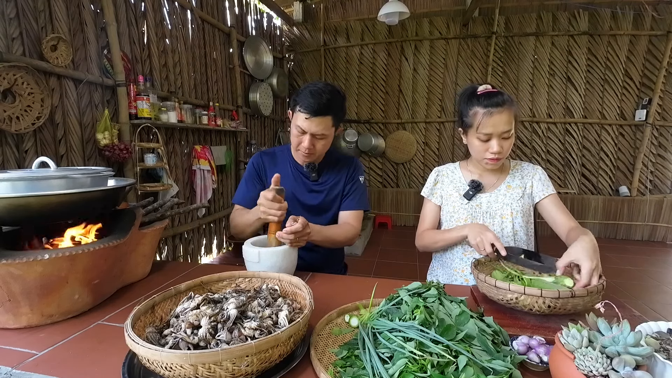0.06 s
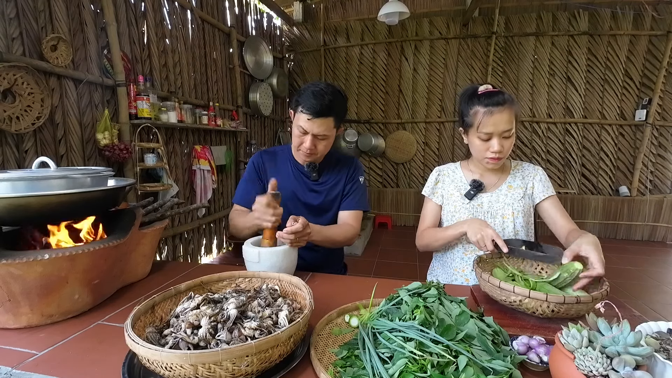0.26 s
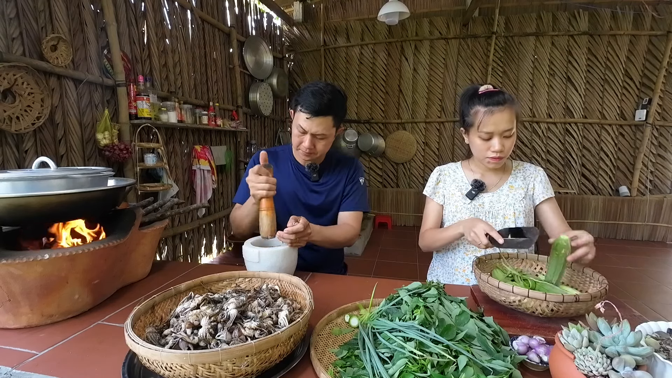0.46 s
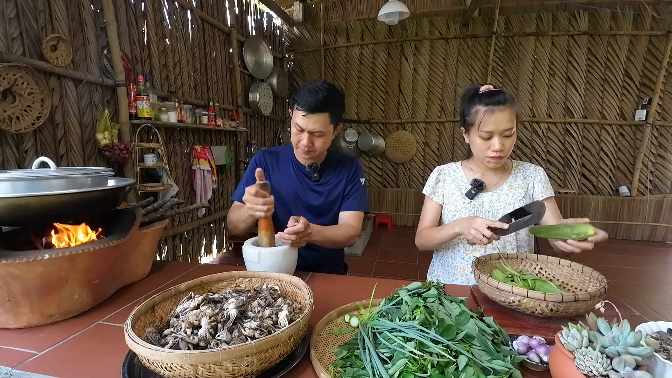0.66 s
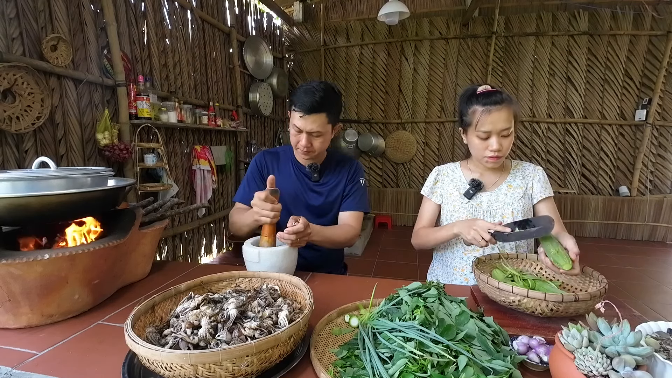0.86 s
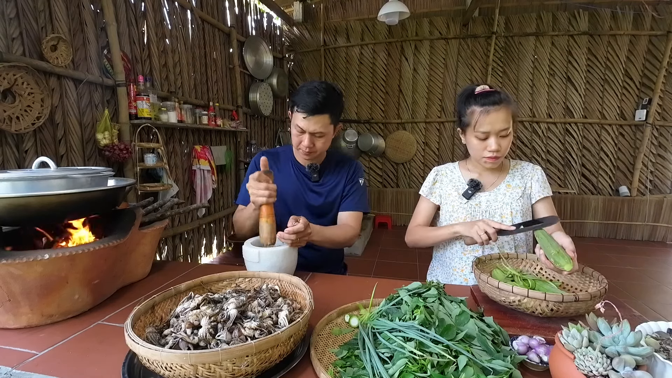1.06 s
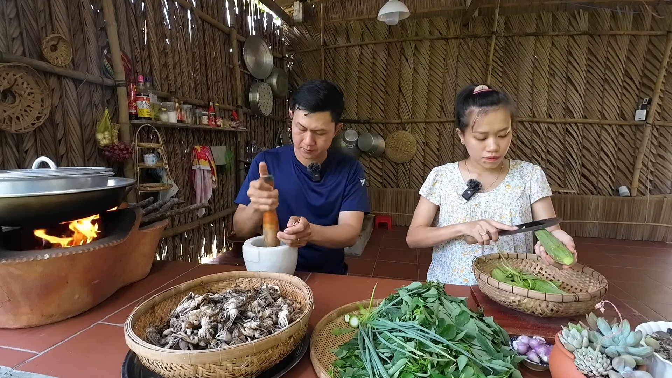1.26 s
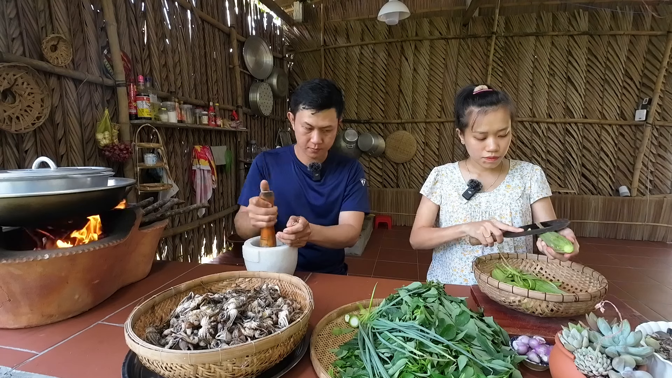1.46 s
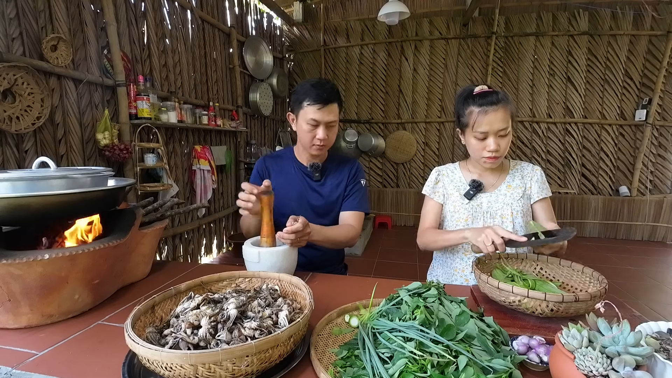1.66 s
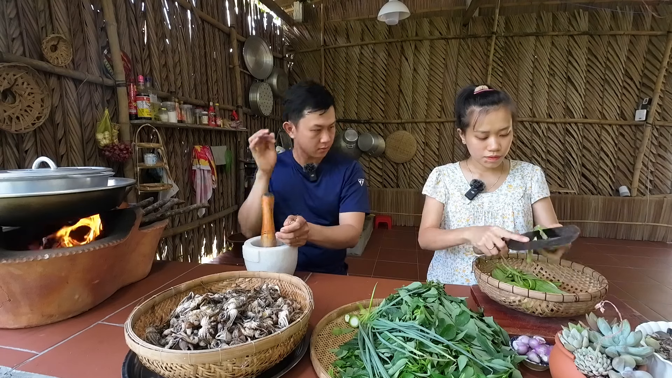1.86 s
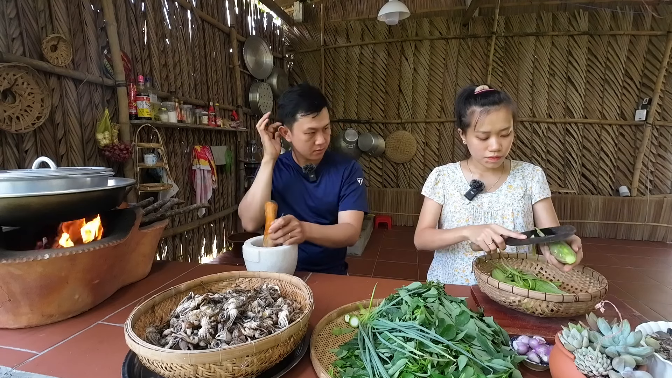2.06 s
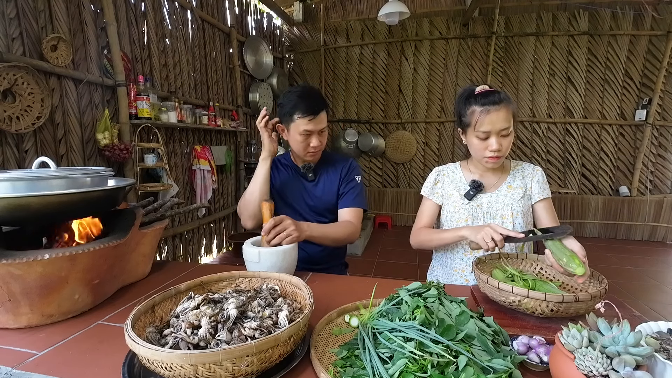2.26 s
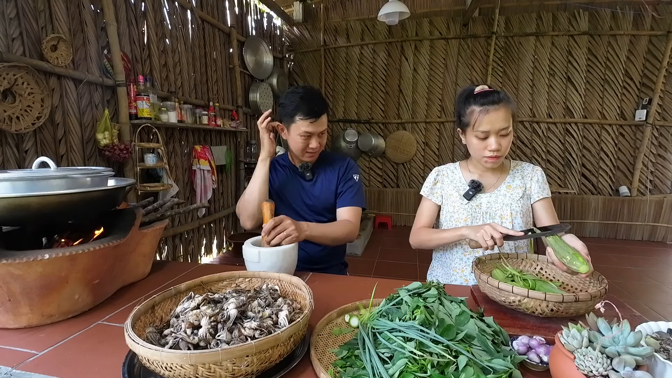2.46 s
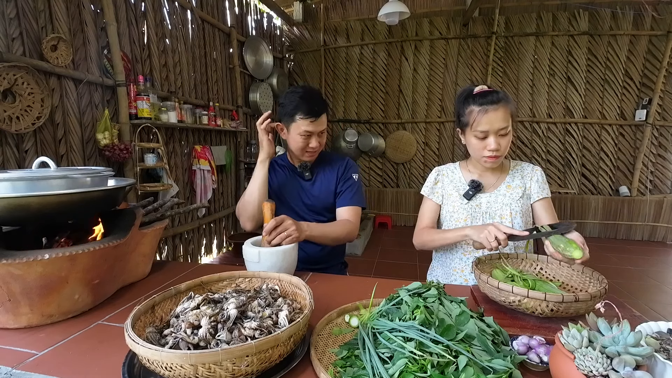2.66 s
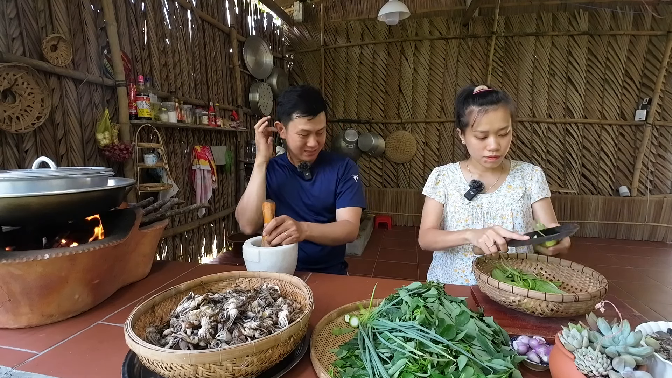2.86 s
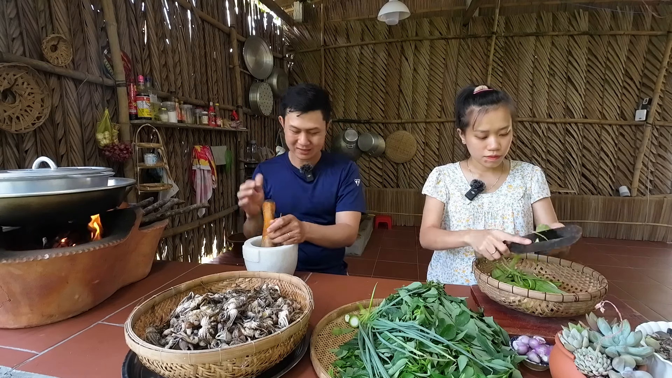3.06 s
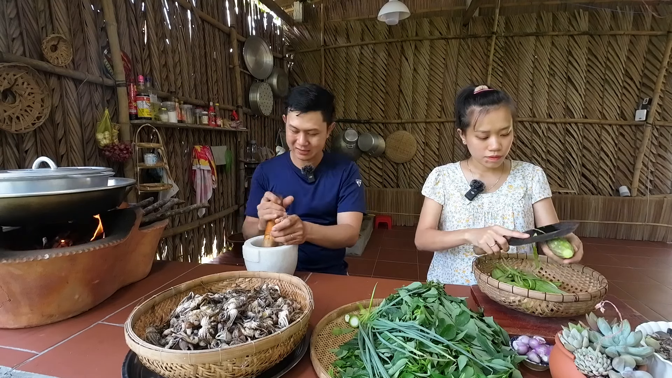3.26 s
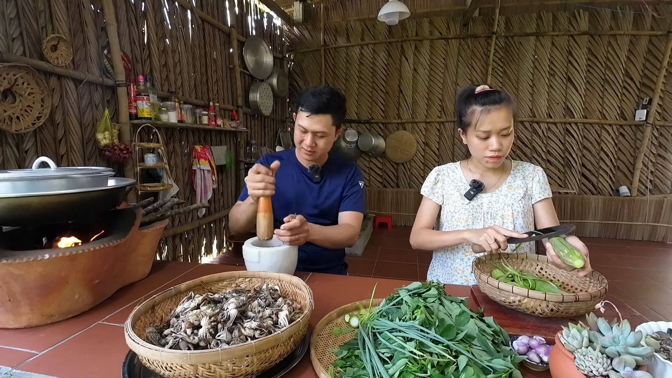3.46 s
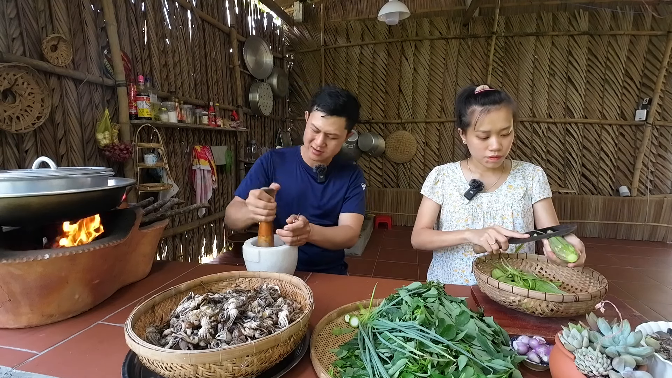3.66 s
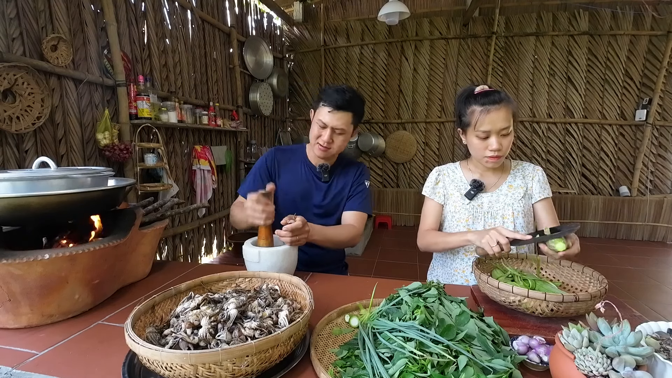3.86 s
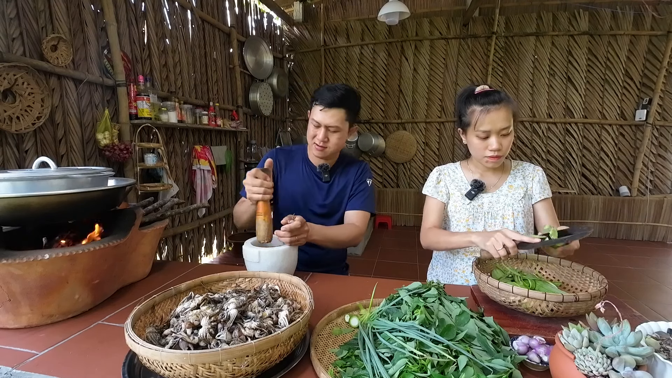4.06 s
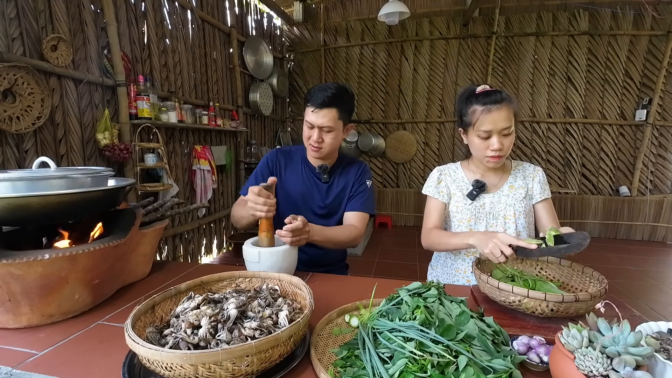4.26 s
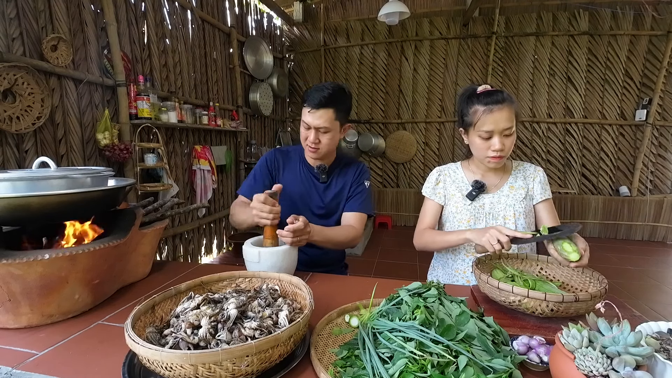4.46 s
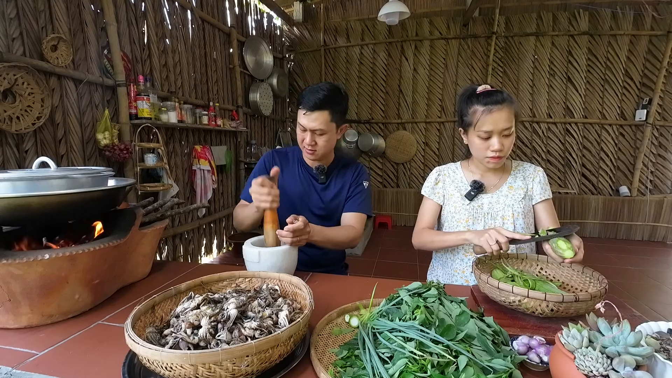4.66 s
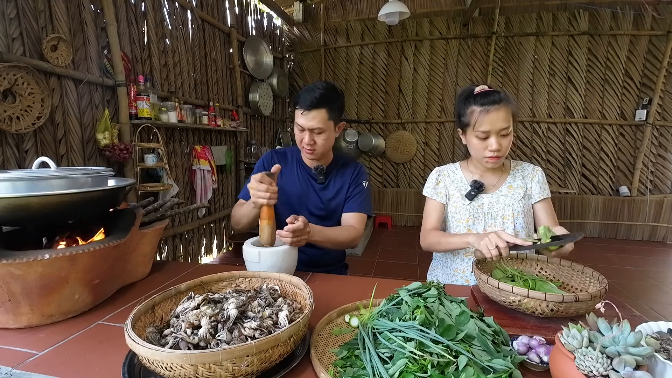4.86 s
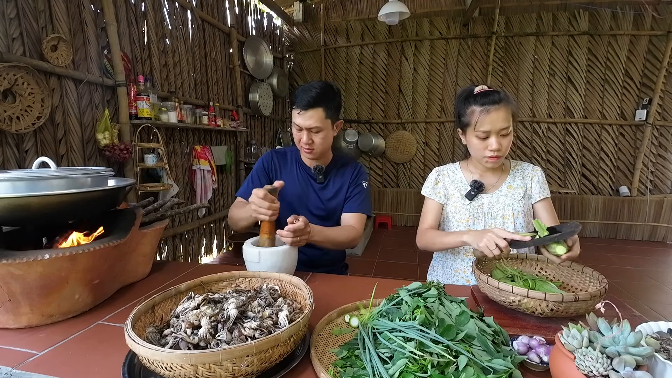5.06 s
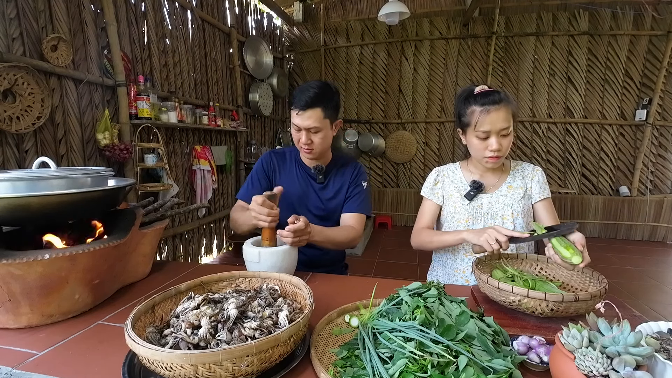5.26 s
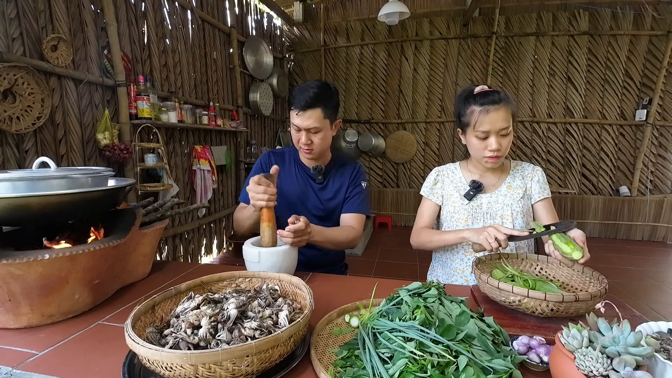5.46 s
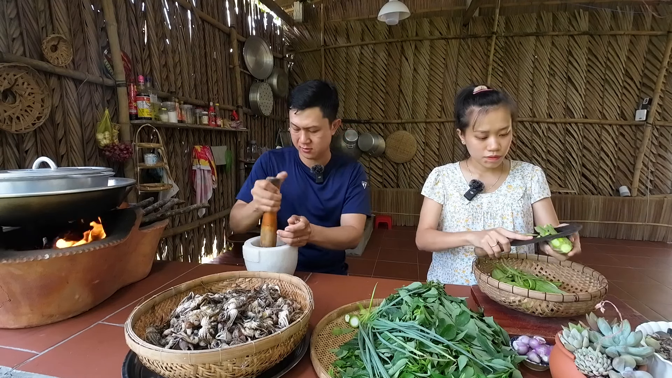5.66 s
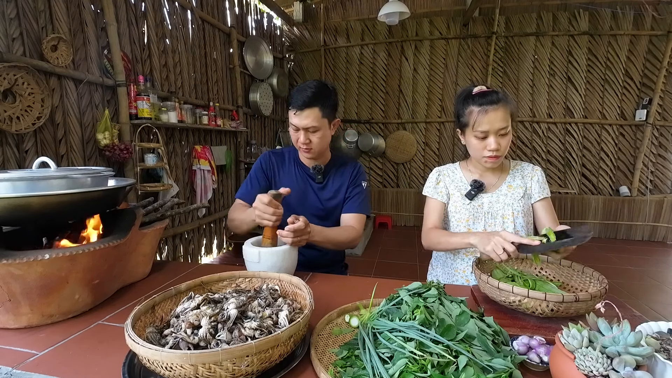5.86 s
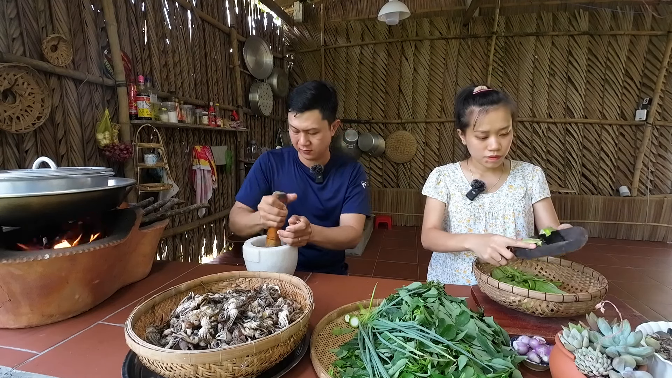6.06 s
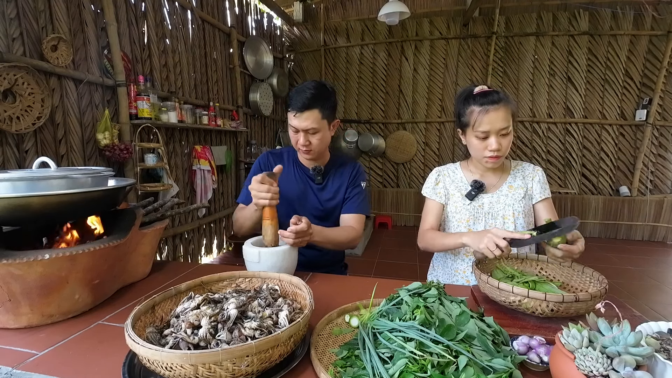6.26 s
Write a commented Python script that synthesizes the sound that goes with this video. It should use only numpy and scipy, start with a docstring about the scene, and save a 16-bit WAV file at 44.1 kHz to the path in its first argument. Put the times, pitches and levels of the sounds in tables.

```python
"""Pounding crabs in a stone mortar

A wooden pestle pounds small crabs in a mortar on a table, in a thatched outdoor kitchen. Each blow
cracks shells, then lands with a thud; the hardest are loud enough to clip. As the shells turn to paste,
the crunch shortens and the thud grows. Midway the pestle is let go and rattles to rest.
Nearby a knife rasps through the peel of a gourd, and a far bird whistles."""
import sys
import numpy as np
from scipy import signal
from scipy.fft import rfft, irfft, next_fast_len
from scipy.io import wavfile
from scipy.ndimage import uniform_filter1d

SR = 44100
rng = np.random.default_rng(int(sys.argv[2]) if len(sys.argv) > 2 else 0)


def to_wav(sig):
    """Store sig (one row per channel, or 1-D mono) as 16-bit WAV at the path in sys.argv[1].

    Samples outside -1..1 are clipped; the rate is SR.
    """
    pcm = np.clip(np.atleast_2d(sig), -1, 1) * 32767
    pcm = np.round(pcm).astype(np.int16)
    wavfile.write(sys.argv[1], SR, pcm.T)  # frames by channels


N = 279064

# The tone of breaking shell. Each row: frequency in Hz, relative level in dB.
SHELL_SPECTRUM = [(200, -17), (700, -5), (1000, -.5), (1300, 0), (1900, 5), (2350, -1), (2900, 2),
                  (4400, -7), (6300, -.5), (8200, 3), (10000, -1.5), (13000, -6), (16000, -10)]


def amp(db):
    """Decibels to gain."""
    return 10 ** (np.asarray(db) / 20)


def unit(x):
    """Scales to rms 1."""
    return x / np.sqrt(np.mean(x ** 2) + 1e-20)


def curve(points, hz):
    """Interpolates a table on a log-frequency axis."""
    point_hz, values = np.transpose(points)
    return np.interp(np.log(hz + 1), np.log(point_hz + 1), values)


def add(mix, s, sound):
    """Mixes a sound in at s seconds."""
    start = round(s * SR)
    sound = sound[max(-start, 0):]
    part = mix[max(start, 0):][:len(sound)]
    part += sound[:len(part)]


def colour(x, db_at):
    """Equalises by a rule that gives dB for each frequency; rms 1."""
    size = next_fast_len(len(x), True)
    gain = amp(db_at(np.fft.rfftfreq(size, 1 / SR)))
    return unit(irfft(rfft(x, size) * gain, size)[:len(x)])


def die_away(x, spectrum, t60s):
    """Lets each frequency start at its own level and fade at its own speed."""
    hz, age, bands = signal.stft(x, SR, nperseg=256)
    level_db = curve(spectrum, hz)[:, None] - 60 * age / curve(t60s, hz)[:, None]
    return signal.istft(bands * amp(level_db), SR, nperseg=256)[1][:len(x)]


def grit(count, spread_db, grain_samples=6):
    """Noise made of tiny fractures of uneven strength."""
    noise = rng.standard_normal(count)
    strength = unit(uniform_filter1d(rng.standard_normal(count), grain_samples))
    return noise * amp(spread_db * strength)


def bump(t, ms):
    """A smooth pulse around t = 0."""
    return np.exp(-.5 * (t * 1000 / ms) ** 2)


def burst(t, ms, db_at):
    """A short cluster of fractures with steep flanks, rms 1 at its height."""
    envelope = np.exp(-abs(t * 1000 / (1.8 * ms)) ** 4)
    cluster = colour(grit(len(t), spread_db=4), db_at) * envelope
    return cluster * np.linalg.norm(envelope) / np.linalg.norm(cluster)


def air(level_db=-44.5, sway_db=1.1):
    """A steady bed of outdoor air, swaying slightly in level."""
    # The tone of the air. Each row: frequency in Hz, relative level in dB.
    spectrum = [(15, -39), (25, -33), (53, -4), (114, -5.5), (190, -3), (317, -1.5), (373, -2.5), (531, -6),
                (775, -6.5), (1160, -9), (1940, -11.5), (2220, -14), (16000, -26)]
    sway = colour(rng.standard_normal(N), lambda hz: -hz * 2)
    bed = colour(rng.standard_normal(N), lambda hz: curve(spectrum, hz))
    return amp(level_db + sway_db * sway) * bed


def bird():
    """A far bird gives faint rising whistles."""
    # Each row: start in seconds, length in seconds, first and last pitch in Hz, level in dB.
    notes = [(0.094, 0.103, 1090, 1175, -45), (.72, 0.059, 1167, 1200, -37.5)]
    out = np.zeros(N)
    for s, length, start_hz, end_hz, db in notes:
        hz = np.linspace(start_hz, end_hz, round(length * SR))
        whistle = np.sin(2 * np.pi * np.cumsum(hz) / SR)
        add(out, s, amp(db) * np.hanning(len(hz)) * whistle)
    return out


def hiss(grain_db=2.5):
    """A soft, grainy high hiss comes and goes between the knife strokes."""
    # Each row: start and end in seconds, level in dB.
    swells = [(1.85, 1.91, -51), (2.99, 3.22, -48.5), (3.22, 3.39, -49.5), (4.12, 4.42, -45.5),
              (4.48, 4.68, -49.5)]
    # The tone of the hiss. Each row: frequency in Hz, relative level in dB.
    spectrum = [(500, -9), (4000, -6), (5500, -8), (9000, -6), (12200, 2.5), (13500, -6), (16000, -8)]
    out = np.zeros(N)
    for start, end, db in swells:
        count = round((end - start) * SR)
        noise = colour(grit(count, grain_db, grain_samples=40), lambda hz: curve(spectrum, hz))
        add(out, start, amp(db) * noise * signal.windows.tukey(count, .5))
    return out


def peeling(grain_db=2.2, catch_db=1.3, bite_s=.07, release_s=.025, swell_db_per_s=7):
    """The blade bites in, rasps through the peel with growing pressure, catches unevenly, slips out."""
    # Each row: start and end in seconds, level in dB.
    strokes = [(1.32, 1.70, -45), (2.57, 2.94, -39.7), (3.55, 3.90, -46), (4.02, 4.125, -45.5),
               (4.62, 4.87, -44.5), (5.41, 5.87, -43.5)]
    # The tone of the blade in the peel. Each row: frequency in Hz, relative level in dB.
    spectrum = [(300, -10), (800, 2), (2000, 1), (2600, -1), (3200, 3), (4200, -4), (6000, -3), (9000, -1),
                (13500, 0), (15000, 7), (16000, 0)]
    out = np.zeros(N)
    for start, end, db in strokes:
        t = np.arange(round((end - start) * SR)) / SR
        rasp = colour(grit(len(t), grain_db, grain_samples=40), lambda hz: curve(spectrum, hz))
        catching = colour(rng.standard_normal(len(t)), lambda hz: -hz / 2)
        contact = np.minimum(t / bite_s, 1) * np.minimum(t[::-1] / release_s, 1)
        pressure = amp(swell_db_per_s * (t - t.mean()))
        add(out, start, amp(db + catch_db * catching) * rasp * contact * pressure)
    return out


def tick(ms, centre_hz, octaves):
    """One small fracture or touch in a band of its own, centred in half a second."""
    t = np.arange(-SR // 4, SR // 4) / SR
    return burst(t, ms, lambda hz: -10 * np.log10(1 + (np.log2((hz + 1) / centre_hz) / octaves) ** 4))


def shell_bits_and_handling():
    """Broad snaps of shell, narrow pings of chips, dull taps and soft rubs."""
    # Larger pieces of shell snap. Each row: time in seconds, level in dB, half-length in ms.
    snaps = [(.288, -27, 1), (.2965, -15, 1.9), (.335, -29, 5), (.574, -22, 1), (.5852, -4, .9),
             (.587, -19.5, 3.9), (.616, -31, 3.7), (.852, -32, 1.5), (5.678, -22.5, .7)]
    # Flying chips land. Each row: time in seconds, level in dB, pitch in Hz.
    chips = [(1.170, -31, 11500), (1.483, -20, 6500), (5.060, -32.5, 7640)]
    # Hand and knife tap lightly. Each row: time in seconds, level in dB, band centre in Hz.
    taps = [(1.7805, -37, 2500), (2.932, -43, 800), (3.199, -43, 3000), (3.457, -46, 1430)]
    # Handling rubs. Each row: midpoint in seconds, level in dB, half-length in ms,
    # band centre in Hz, half-width in octaves.
    rubs = [(3.58, -48, 60, 1800, .16), (3.835, -45, 28, 1680, .83), (4.10, -42, 9, 900, .4)]
    ticks = [(s, db, tick(ms, centre_hz=5300, octaves=1.8)) for s, db, ms in snaps]
    ticks += [(s, db, tick(ms=.95, centre_hz=hz, octaves=.18)) for s, db, hz in chips]
    ticks += [(s, db, tick(ms=1.9, centre_hz=hz, octaves=.65)) for s, db, hz in taps]
    ticks += [(s, db, tick(ms, hz, octaves)) for s, db, ms, hz, octaves in rubs]
    out = np.zeros(N)
    for s, db, sound in ticks:
        add(out, s - len(sound) / 2 / SR, amp(db) * sound)
    return out


def kitchen_tail(x, rise_s=.0096):
    """A short diffuse tail under the thatch; it changes as the people move."""
    # The tone of the tail as it starts. Each row: frequency in Hz, level in dB.
    spectrum = [(100, -49), (300, -43), (800, -45), (2000, -48.5), (14000, -51)]
    # Its decay. Each row: frequency in Hz, seconds to fall 60 dB.
    t60s = [(150, .36), (600, 0.2964), (2000, 0.2365), (14000, 0.03)]
    age, clock = np.arange(SR // 2) / SR, np.arange(N) / SR
    out = np.zeros(N)
    for k in range(3):
        tail = die_away(rng.standard_normal(len(age)), spectrum, t60s) * (1 - np.exp(-age / rise_s))
        crossfade = np.cos(np.pi * (clock + k / 3))
        out += signal.fftconvolve(x * crossfade, tail)[:N]
    return out


def reflections(x):
    """Table top and bodies throw the sound back within a few hundredths of a second."""
    # Each row: delay in seconds, gain.
    echoes = [(.0047, 0.21), (.0074, 0.79), (.0115, -0.16), (.0154, 0.11), (.0229, 0.2)]
    out = np.zeros(N)
    for delay, gain in echoes:
        add(out, delay, gain * x)
    return out


def low_cut(x, corner_hz=74):
    """Thins the deepest bass of the thuds."""
    size = next_fast_len(N, True)
    hz = np.fft.rfftfreq(size, 1 / SR)
    return irfft(rfft(x, size) * hz ** 2 / (hz ** 2 + corner_hz ** 2), size)[:N]


def thud(t, table_db, contact_ms, table_below_hz=230, detune=.011):
    """The pestle lands: a soft push rings mortar and table; a cushioned landing is duller."""
    # Mortar and table ringing. Each row: frequency in Hz, relative level in dB, seconds to fall 60 dB.
    modes = [(102.5, -27, 0.16), (157.7, -20.5, 0.27), (193.5, -13.5, 0.19), (209.3, -16.5, 0.14),
             (257.2, -13.5, 0.078), (369.7, -23, 0.16), (437.2, -14.5, 0.1), (492.4, -6.5, 0.12),
             (576, -9.5, 0.069), (685.8, -4.5, 0.037), (799.4, -12.5, 0.059), (890, -34.5, 0.032),
             (1080, -31, 0.11)]
    age, ring = np.maximum(t, 0), np.zeros(len(t))
    for hz, db, t60 in modes:
        level_db = db + table_db * (hz < table_below_hz) - 60 * age / t60
        pitch = hz * (1 + detune * rng.standard_normal())
        ring += amp(level_db) * np.cos(2 * np.pi * pitch * age)
    push = bump(t[abs(t) < .005], contact_ms)
    return signal.fftconvolve(ring * (t >= 0), push / push.sum(), "same")


def clack(t, ms, tilt_db_per_octave, note_hz, detune=.015):
    """The wooden pestle rings briefly; hard shells favour its high notes, grip and spot shift them all."""
    # The wood's ring. Each row: frequency in Hz before tuning to note_hz, relative level in dB,
    # seconds to fall 60 dB.
    modes = [(792, -2, 0.024), (1237, -13, 0.01), (1574, -3.5, 0.016), (1846, 0, 0.015),
             (2037, -4.5, 0.025), (2736, -9.5, 0.019), (3097, -11, 0.014)]
    main_hz = max(modes, key=lambda mode: mode[1])[0]
    push = bump(t + ms / 1000, ms / 2)
    out = np.zeros(len(t))
    for hz, db, t60 in modes:
        decay_per_sample = 1e-3 ** (1 / (t60 * SR))
        envelope = signal.lfilter([1], [1, -decay_per_sample], push)
        pitch = hz * note_hz / main_hz * (1 + detune * rng.standard_normal())
        tone = np.sin(2 * np.pi * (pitch * t + rng.random()))
        level_db = db + tilt_db_per_octave * np.log2(hz / 1500)
        out += amp(level_db) * envelope / envelope.max() * tone
    return out


def rattle(clack_ms=1.1, grit_db=-25, free_hz=2010, free_t60_s=.08, free_db=-11):
    """The loose pestle rocks against the gritty rim; with no hand on it, the wood rings on."""
    # Each row: time in seconds, relative levels of thud and clack in dB.
    knocks = [(1.8906, -8.5, -17.5), (1.9326, -17, -28), (1.9602, -16.5, -37), (1.9746, -29, -37)]
    t = np.arange(-SR // 30, SR // 3) / SR
    early = t + clack_ms / 1000  # the clack leads the thud
    free_ring = (t >= 0) * amp(free_db - 60 * abs(t) / free_t60_s) * np.sin(2 * np.pi * free_hz * t)
    thuds, clacks = np.zeros((2, N))
    for s, thud_db, clack_db in knocks:
        scratch = amp(grit_db) * burst(early, clack_ms, lambda hz: curve(SHELL_SPECTRUM, hz))
        add(thuds, s + t[0], amp(thud_db) * thud(t, table_db=-9, contact_ms=.24))
        wood = clack(early, clack_ms, tilt_db_per_octave=-7, note_hz=1850)
        add(clacks, s + t[0], amp(clack_db) * (wood + free_ring + scratch))
    return thuds, clacks


def pounding(touch_db=-26, touch_s=.0033, table_lead_db=7, table_top_db=1.3):
    """Each blow touches the shells, crunches and clacks through them, lands, and leaves crumbs settling."""
    # Each row: landing in seconds, relative thud level in dB, contact in ms,
    # relative crunch and clack levels in dB, main note of the clack in Hz.
    blows = [(0.0223, -15.5, .19, -4.5, -4.5, 1900), (0.3065, -11.5, .27, -7, -11, 1950),
             (0.5826, -18, .17, -8, -7, 1850), (0.865, -16, .17, -2, -6, 1860),
             (1.1524, -12.3, .14, -5, -7, 1780), (1.4505, -4, .15, -4, -8, 1820),
             (3.6519, -3.4, .19, -6.5, -11.5, 1850), (3.9129, -5.3, .3, -6.5, -12, 2050),
             (4.1862, -2, .34, -2.5, -13, 1750), (4.4649, -2, .16, -5, -13.5, 1850),
             (4.7413, 2, .24, -3.5, -8.5, 1800), (5.0103, 4.5, .1, -4, -6, 1750),
             (5.2793, 1.7, .24, -5.3, -8, 1850), (5.5563, 5, .12, -2, -8.5, 1780),
             (5.8289, .5, .26, -14, -11, 1900), (6.0979, 3, .22, -9.5, -13, 1800)]
    # Crushed shell starting to settle. Each row: frequency in Hz, gain on the shell's tone in dB.
    crumb_spectrum = [(200, -32), (900, -20.5), (2800, -18), (5000, -19.5), (8000, -28), (15000, -24.5)]
    # How the crumbs fade. Each row: frequency in Hz, seconds to fall 60 dB.
    crumb_t60s = [(600, 0.35), (2500, 0.28), (7000, 0.29), (15000, 0.32)]
    t = np.arange(-SR // 30, SR // 3) / SR
    thuds, clacks, crunches, crumbs = np.zeros((4, N))
    for s, thud_db, contact_ms, crunch_db, clack_db, note_hz in blows:
        # Whole shells cushion a blow: the weaker its thud, the longer and brighter its crunch and clack.
        crunch_ms = 1.05 * 2 ** (-thud_db / 15)  # half-length
        crunch_tilt, clack_tilt = .2 - .08 * thud_db, -5.3 - .5 * thud_db  # dB per octave
        shell_tone = lambda hz: curve(SHELL_SPECTRUM, hz) + crunch_tilt * np.log2((hz + 100) / 5000)
        # The table's low modes follow the thud until its legs give no more.
        table_db = min(table_lead_db, table_top_db - thud_db)
        early = t + 1.5 * crunch_ms / 1000  # the shells break just before the landing
        crackle = colour(grit(len(t), spread_db=12), shell_tone)
        touch = amp(touch_db) * np.exp(-abs(early) / touch_s) * crackle
        debris = colour(grit(len(t), spread_db=2, grain_samples=90), shell_tone)
        crumb_db = -2.6 + .6 * crunch_db
        add(thuds, s + t[0], amp(thud_db) * thud(t, table_db, contact_ms))
        add(clacks, s + t[0], amp(clack_db) * clack(early, crunch_ms, clack_tilt, note_hz))
        add(crunches, s + t[0], amp(crunch_db) * (burst(early, crunch_ms, shell_tone) + touch))
        add(crumbs, s, amp(crumb_db) * die_away(debris, crumb_spectrum, crumb_t60s))
    return thuds, clacks, crunches, crumbs


def scene(thud_db=.8, clack_db=.7, crunch_db=.3, shell_echo_db=-17):
    """The kitchen in mono; the near surfaces throw back mostly thud."""
    thuds, clacks, crunches, crumbs = pounding()
    rim_thuds, rim_clacks = rattle()
    thuds = amp(thud_db) * low_cut(thuds + rim_thuds)
    clacks = amp(clack_db) * (clacks + rim_clacks)
    crunches = amp(crunch_db) * crunches
    echoes = reflections(thuds + amp(shell_echo_db) * (clacks + crunches))
    ringing = thuds + clacks + shell_bits_and_handling() + bird() + echoes
    return (ringing + kitchen_tail(ringing) + crunches + crumbs + peeling() + hiss() + air())[None]


def record(dry, cutoff_hz=16050):
    """The loudest peaks clip at full scale, then the highest treble is cut."""
    clipped = np.clip(dry, -1, 1)
    low_pass = signal.firwin(301, cutoff_hz, window=("kaiser", 8), fs=SR)
    return signal.oaconvolve(clipped, low_pass[None], "same")


dry = scene()
out = record(dry)
to_wav(out)
```